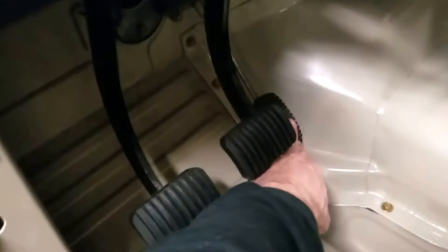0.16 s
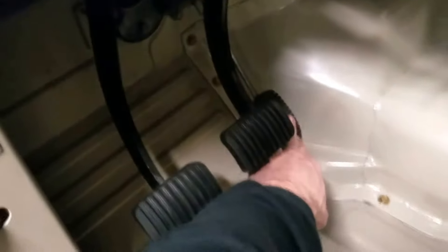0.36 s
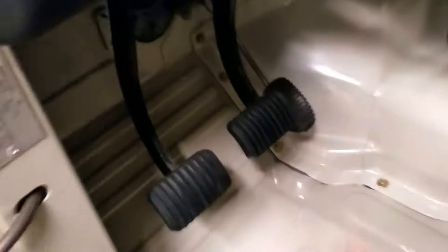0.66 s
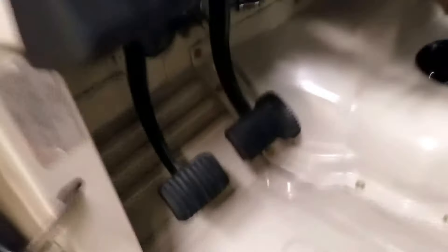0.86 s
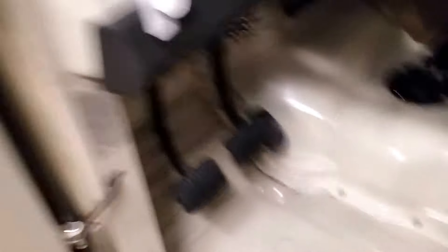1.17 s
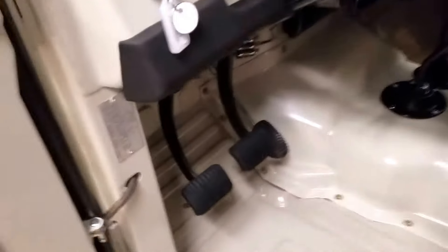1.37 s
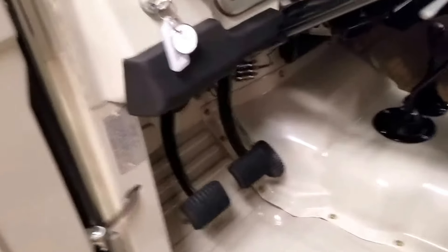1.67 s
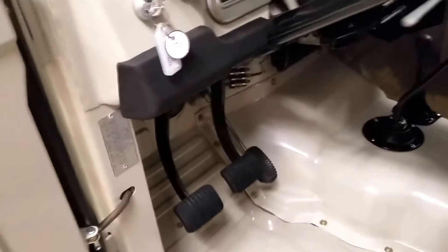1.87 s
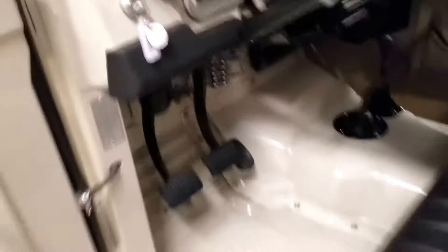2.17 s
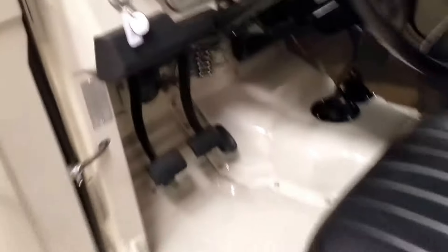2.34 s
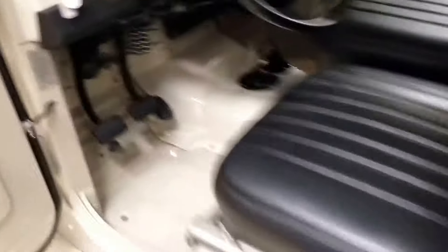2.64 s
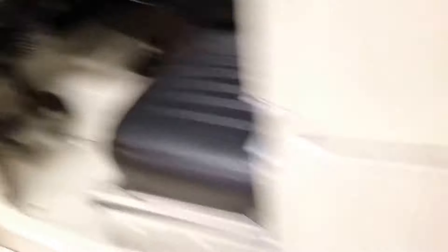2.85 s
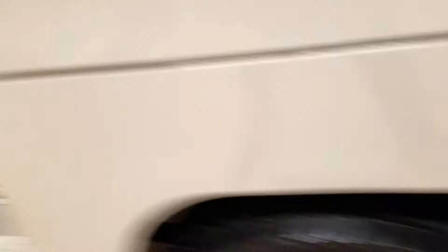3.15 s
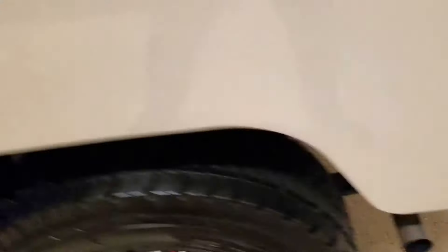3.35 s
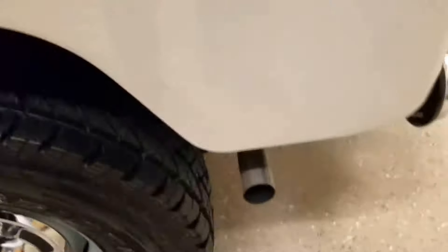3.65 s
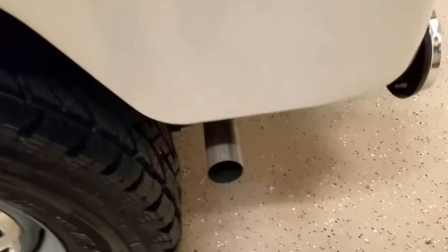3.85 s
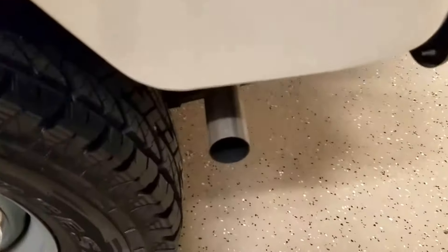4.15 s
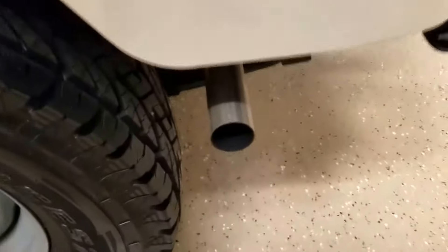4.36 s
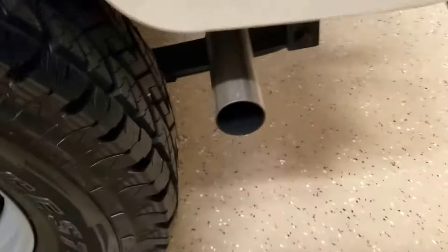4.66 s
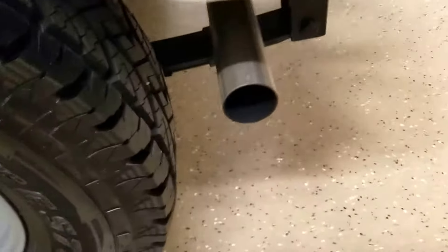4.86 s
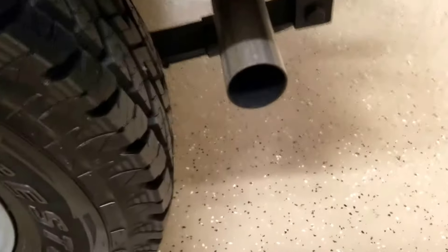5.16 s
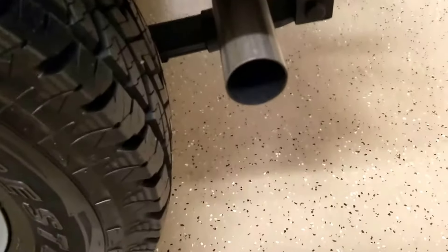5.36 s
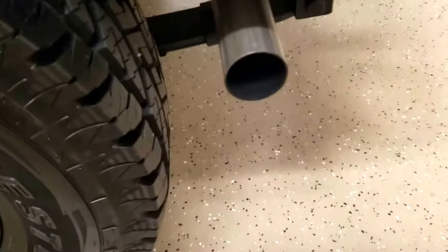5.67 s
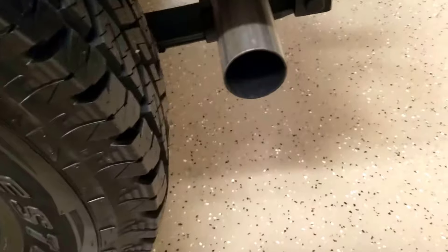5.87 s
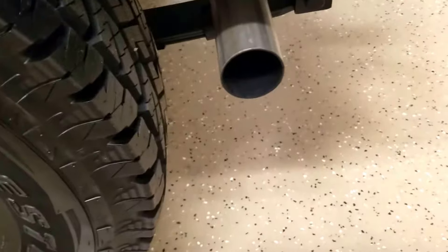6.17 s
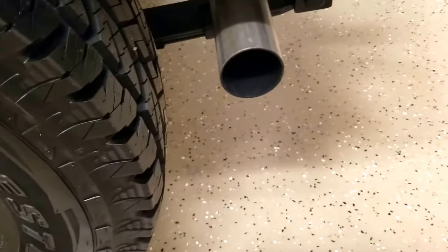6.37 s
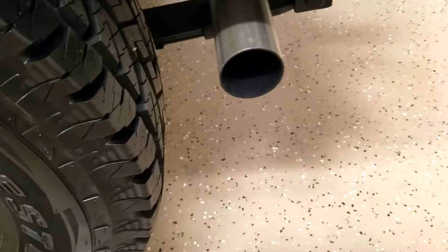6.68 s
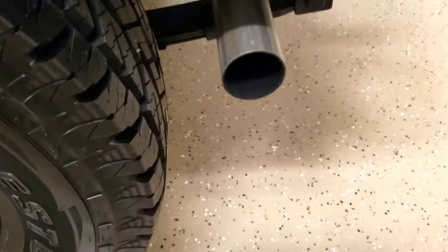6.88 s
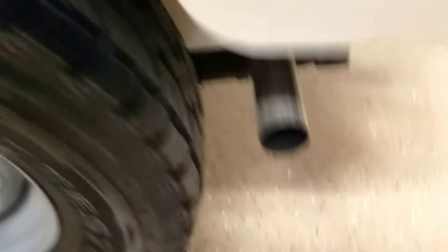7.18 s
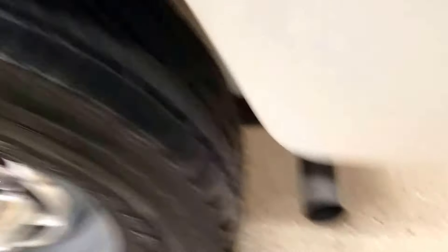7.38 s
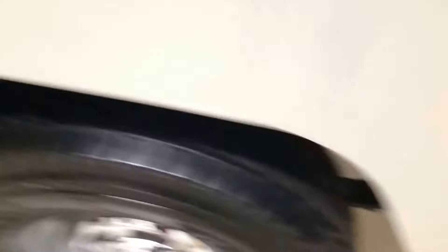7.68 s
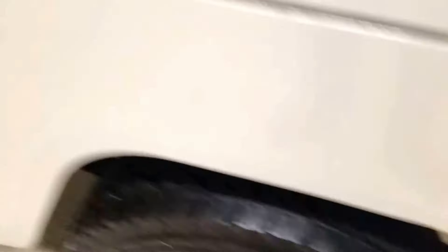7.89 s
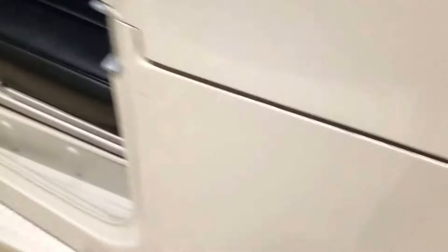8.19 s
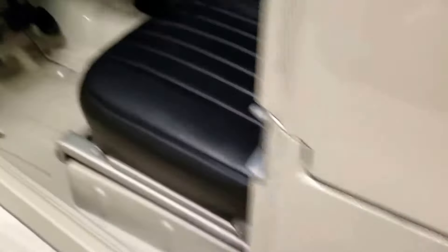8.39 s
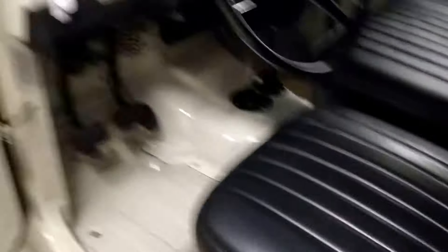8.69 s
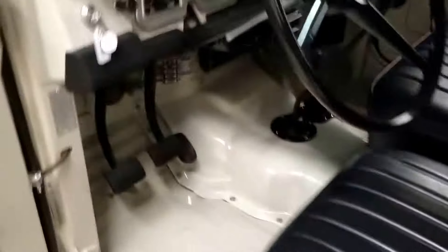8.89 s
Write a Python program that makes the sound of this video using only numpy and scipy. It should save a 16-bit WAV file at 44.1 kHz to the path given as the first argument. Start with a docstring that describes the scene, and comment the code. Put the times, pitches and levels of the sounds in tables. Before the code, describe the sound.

An old six-cylinder petrol engine gets one quick throttle dab, sinks to a loping idle, then thumps and whistles up close at the tailpipe.

```python
"""Four-by-four idling in a garage

An old six-cylinder petrol engine gets one dab of throttle, then sinks back to idle.
Two microphones start in the footwell, move past the droning body to the tailpipe, and head back.
Each firing sends a pressure thump through the exhaust and a puff of gas out of its whistling mouth.
Shaped noise makes valve clatter, intake hiss and roar; rough, wavering tones make the fan; the garage echoes."""
import sys
import numpy as np
from scipy import signal
from scipy.fft import rfft, irfft, next_fast_len
from scipy.io import wavfile
from scipy.ndimage import map_coordinates

SR = 44100
rng = np.random.default_rng(int(sys.argv[2]) if len(sys.argv) > 2 else 0)


def dump(signal):
    """Clip the signal to [-1, 1] and save it as 16-bit WAV at the path in sys.argv[1]."""
    limited = np.clip(np.atleast_2d(signal).T, -1, 1)
    pcm = np.round(limited * 32767).astype(np.int16)
    wavfile.write(sys.argv[1], SR, pcm)


N = 398223

# gas leaving the pipe, one row per cylinder in firing order:
# (puff [dB], low whistle [dB], high whistle [dB], delay [s])
PUFFS = [(-1, -3, -3, 0.0029), (-.5, 0, 1, 0.0032), (1, 0.5, 1.5, -0.0009), (-.5, -1.5, 1.5, 0.0029),
         (-1.5, 0, 0, 0.00011), (3, 3, 1.5, -0.000096)]
CYLINDERS, FIRINGS_PER_TURN = 6, 3
IDLE_HZ = 44  # firings per second
FOOTWELL_M = 2.59  # farther than this from the tailpipe, one is in the footwell


def amp(db):
    """Decibels to gain."""
    return 10 ** (np.asarray(db) / 20)


def unit(x):
    """Scale to rms 1."""
    return x / np.sqrt(np.mean(x ** 2) + 1e-20)


def along(points, hz):
    """Read a value at hz from (frequency, value) points on a log frequency axis."""
    f, v = np.transpose(points)
    return np.interp(np.log(hz + 1), np.log(f + 1), v)


def curve(points):
    """Join (time, value) points by straight lines, one value per sample."""
    s, value = np.transpose(points)
    return np.interp(np.arange(N) / SR, s, value)


def wobble(rate):
    """A smooth random curve with rate random knots a second."""
    knots = rng.standard_normal(int(N * rate / SR) + 4)
    return map_coordinates(knots, [np.arange(N) * rate / SR])


def filtered(x, response):
    """Multiply the spectrum of x by a response, a function of frequency."""
    m = next_fast_len(N + SR // 2)
    return irfft(rfft(x, m) * response(np.fft.rfftfreq(m, 1 / SR)), m)[..., :N]


def resonate(x, modes):
    """Ring x through resonances, each strongest at its own centre frequency; rms 1."""
    def response(f):
        total = 0
        for k, (centre, width, db) in enumerate(modes):
            band = 1j * f * width
            # neighbouring resonances have opposite polarity
            total = total + (-1) ** k * amp(db) * band / (centre * centre - f * f + band)
        return total
    return unit(filtered(x, response))


def rush(spectrum):
    """Stereo noise of rms 1; how alike the two sides are depends on frequency."""
    # left-right likeness of noise: (frequency [Hz], correlation [-1 to 1])
    likeness = [(100, 0.87), (300, 0.29), (650, 0.93), (1400, -0.54), (3000, 0.052), (6800, -0.25),
                (15000, -0.054)]

    def colour(hz):
        turn = np.arccos(np.clip(along(likeness, hz), -1, 1)) / 2
        return amp(along(spectrum, hz)) * np.array([np.cos(turn), np.sin(turn)])
    mid, side = filtered(rng.standard_normal((2, N)), colour)
    return unit(np.array([mid + side, mid - side]))


def pulses(times, db):
    """One impulse at each time."""
    at = np.round(times * SR).astype(int)
    inside = (at >= 0) & (at < N)
    return np.bincount(at[inside], amp(db)[inside], N)


def gusts(times, db, rise, decay, steady):
    """An envelope of rms 1 that swells and dies after each time (in seconds), over a steady share."""
    t = np.arange(SR // 12) / SR
    shape = (1 - np.exp(-t / rise)) * np.exp(-t / decay)
    bursts = signal.fftconvolve(pulses(times, db), shape)[:N]
    return unit(steady + unit(bursts))


def scatter(db, spread_db):
    """Levels that differ a little from firing to firing."""
    return db + spread_db * rng.standard_normal(len(db))


def firing_rate():
    """Engine speed in firings per second: a quick rise, then a fall to idle."""
    # engine speed: (time [s], firing rate [Hz])
    speed = [(0.0, 46.99), (0.21, 53.98), (0.52, 82.92), (0.59, 82.87), (1.18, 51.39), (1.62, 43.8),
             (3.21, 43.35), (3.94, 44.56), (4.43, 43.93), (6.11, 44.6), (6.45, 44.23), (9.03, 44.49)]
    return curve(speed)


def revs():
    """Octaves of engine speed above idle."""
    return np.log2(firing_rate() / IDLE_HZ)


def pedal():
    """Throttle opening, 0 to 1: pressed, held, let go."""
    press_s, opening_takes_s = 0.042, 0.19
    lift_s, closing_takes_s = 0.577, 0.14
    t = np.arange(N) / SR
    opened = np.clip((t - press_s) / opening_takes_s, 0, 1)
    return opened * np.clip(1 - (t - lift_s) / closing_takes_s, 0, 1)


def distance():
    """Metres from the tailpipe to the microphones as they are carried along."""
    # the walk towards the tailpipe and back: (time [s], distance from the tailpipe [m])
    walk = [(0, 2.82), (1.9, 2.595), (2.35, 2.51), (2.8, 1.91), (3.2, 1.61), (3.35, 1.11), (3.9, 1.02),
            (5.1, 0.42), (6.85, 0.34), (7.5, 1.1), (8.0, 1.6), (9.03, 2.46)]
    return curve(walk)


def beyond(edge_m):
    """0 while nearer to the tailpipe than an edge, 1 once past it, with a soft step between."""
    softness_m = 0.075
    return (1 + np.tanh((distance() - edge_m) / (2 * softness_m))) / 2


def heard(spot):
    """Gain of a source at the microphones: it falls with distance and changes in the footwell."""
    place_m, reach_m, db, fall_db, shade_db = spot
    away = np.hypot(1, (distance() - place_m) / reach_m)
    return amp(db - fall_db * np.log10(away) - shade_db * beyond(FOOTWELL_M))


def boom(modes, hz):
    """Gain of a tone at hz in a set of air resonances, highest at their centres."""
    return sum(amp(db) / (1 + (2 * (hz - centre) / width) ** 2) for centre, width, db in modes)


def throb(phase, lag):
    """Deep tones at 1, 2 and 3 times the firing rate, swelled by cab and intake air, over an uneven lope."""
    # tailpipe throb, one row per multiple of the firing rate: (loudest place [m from tailpipe],
    # reach [m], level [dB], fall per tenfold distance [dB], loss in the footwell, negative is a gain [dB])
    throb_spots = [(.3, .9, -14, 25, -2.5), (.3, 1.17, -14.5, 43, 0), (.7, .9, -13.5, 27.5, 10.5)]
    # air resonances of the cab, and of the intake with the throttle open:
    # (centre [Hz], width [Hz], level [dB])
    cab_modes = [(55.2, 4, -14), (76, 6.5, -12), (140, 26, -14.5), (254, 12, -15.5)]
    intake_modes = [(63, 17.4, -4), (107, 11, -14.5), (150.6, 27, -13.5)]
    # the lope, between the firing harmonics:
    # (cycles per turn of the crank [count], level relative to the first throb [dB])
    lope_orders = [(4, -14.5), (8, -21.5), (10, -11.5)]
    lope_lag = 0.794  # firings after the first cylinder
    cab_wakes_octaves = 0.073  # the cab booms fully from this far above idle
    silencer_hz = 110

    speed = firing_rate()
    cab_share = beyond(FOOTWELL_M) * np.clip(revs() / cab_wakes_octaves, 0, 1)
    opening = pedal()
    lope = 0
    for order, db in lope_orders:
        turns = (phase - lope_lag) / FIRINGS_PER_TURN
        lope = lope + amp(db + wobble(8)) * np.cos(2 * np.pi * order * turns)
    out = heard(throb_spots[0]) * lope
    for k, spot in enumerate(throb_spots, 1):
        tailpipe = heard(spot)
        cab = cab_share * boom(cab_modes, k * speed)
        intake = opening * boom(intake_modes, k * speed)
        level = np.linalg.norm([tailpipe, cab, intake], axis=0)  # the powers add
        # tones above the silencer's resonance leave it inverted
        polarity = np.sign(silencer_hz - k * IDLE_HZ)
        out = out + polarity * level * amp(0.31 * wobble(18)) * np.cos(2 * np.pi * k * (phase - lag))
    return out


def thumps(times, db, modes):
    """Pressure pulses, very nearly alike from cycle to cycle, ring a hollow."""
    # random spread: 0.07 ms in time, 0.6 dB in level
    late, uneven_db = rng.standard_normal((len(times), 2)).T * [[.00007], [.6]]
    return resonate(pulses(times + late, db + uneven_db), modes)


def exhaust(times, cylinder):
    """Unequal manifold runs make the pulses lope; they ring the pipe and the hollow under the body."""
    # exhaust manifold, one row per cylinder in firing order: (arrival delay [s], thump level [dB])
    manifold = [(.0005, 2.1), (-.00045, -.6), (.00034, 0), (.00033, 1.3), (-.00083, -.6), (.0004, -.5)]
    # resonances of the pipe and of the hollow: (centre [Hz], width [Hz], relative level [dB])
    pipe_modes = [(164.5, 18.3, -5), (204.8, 8.6, 5), (268, 11, -12.5), (310, 12.9, -13.5),
                  (399.7, 7.8, -5.5), (439.7, 5.3, -8), (631.5, 24, -20.5), (689, 12, -26),
                  (809, 19.2, -17.5)]
    hollow_modes = [(177, 22, -8.5), (201, 16.7, 0), (231.8, 18, 2), (428, 20, -20)]
    # where pipe and hollow are heard: (loudest place [m from tailpipe], reach [m], level [dB],
    # fall per tenfold distance [dB], loss in the footwell [dB])
    pipe_spot = (-0.23, 0.5, -13, 11, 14)
    hollow_spot = (1.92, 0.76, -19, 40, 11)

    delay, thump_db = np.array(manifold)[cylinder].T
    arrivals = times + delay + .0012
    pipe = heard(pipe_spot) * thumps(arrivals, thump_db, pipe_modes)
    drone = heard(hollow_spot) * thumps(arrivals, thump_db, hollow_modes)

    # the hollow lies to the right: the left side hears it 0.4 ms later and 3 dB weaker
    def lateness(f):
        return np.exp(1j * np.pi * f * .0004 * np.array([[-1], [1]]))
    return pipe + filtered(drone, lateness) * amp([[-1.5], [1.5]])


def whistle(times, db, hz, length, stray, sag, spread_db):
    """Each slug of gas sings briefly at the pipe mouth; on average the pitch sags as the slug slows."""
    t = np.arange(int(length * SR)) / SR
    detune, start, late, slowing = rng.standard_normal((len(times), 4)).T[..., None]
    pitch = hz * (1 + stray * detune - sag * (1 + slowing) * (t / length - 1 / 4))
    tone = np.sin(2 * np.pi * (np.cumsum(pitch, axis=1) / SR + start))
    swell = np.sin(np.pi * np.sqrt(t / length)) ** 5
    notes = amp(scatter(db, spread_db))[:, None] * swell * tone
    # each note starts about a millisecond early or late
    at = np.maximum(np.round((times[:, None] + late / 1000 + t) * SR), 0).astype(int)
    return unit(np.bincount(at.ravel(), notes.ravel(), N)[:N])


def pipe_mouth(times, cylinder):
    """Each slug of gas leaves with a rasp, two whistles and a sharper spit that varies by cylinder."""
    # noise colours of the rasp, of the spit, and of the sizzle by the rear wheel arch:
    # (frequency [Hz], relative level per hertz [dB])
    rasp_colour = [(200, 14), (450, 14), (800, 11), (920, -21), (1400, 2.5), (1950, 14), (2300, 7.5),
                   (2900, -28), (3500, 2), (4600, -0.5), (5300, -3.5), (6000, -21), (14000, -43)]
    spit_colour = [(2600, -23), (3400, 6), (4200, -3.5), (5200, 3.5), (6000, -15), (7400, -9),
                   (12000, -19.5)]
    sizzle_colour = [(1400, -25), (1950, 0), (2260, 6.5), (2600, -10), (3300, -9), (4000, -13.5),
                     (4800, -37), (6000, -45), (7600, -20), (12000, -46)]
    # where the mouth and the rear wheel arch are heard: (loudest place [m from tailpipe], reach [m],
    # level [dB], fall per tenfold distance [dB], loss in the footwell [dB])
    mouth_spot = (0.53, 0.54, -23.5, 24.5, 1)
    arch_spot = (1.6, 0.86, -30, 53, 19)
    # beyond this distance the rear wheel hides the mouth, most of all its low whistle
    wheel_m, wheel_shade_db, extra_low_whistle_shade_db = 1.39, 6, 1

    puff_db, low_db, high_db, delay = np.array(PUFFS)[cylinder].T
    low = whistle(times - .007 + delay, low_db, hz=1053, length=.036, stray=.011, sag=.022, spread_db=2.1)
    high = whistle(times - .003 + delay, high_db, hz=2108, length=.033, stray=.012, sag=.016, spread_db=2.3)
    hidden = beyond(wheel_m)
    # the whistles catch well for a few firings, then less well
    low_gain = amp(-2 - extra_low_whistle_shade_db * hidden + 1.6 * wobble(11))
    high_gain = amp(-4.6 + 1.6 * wobble(11))
    tones = low_gain * low + high_gain * high

    chuff = gusts(times - .003, scatter(puff_db, 2.3), rise=0.0033, decay=0.0081, steady=0.73)
    # the spit exaggerates the differences between cylinders
    spurt = gusts(times - .004, scatter(2.2 * puff_db, 2.8), rise=.005, decay=.009, steady=.35)
    rasp = amp(-2.5 + wobble(13)) * chuff * rush(rasp_colour)
    spit = amp(-13.5 + 2.1 * wobble(10)) * spurt * rush(spit_colour)
    mouth = heard(mouth_spot) * amp(-wheel_shade_db * hidden) * (tones + rasp + spit)
    sizzle = heard(arch_spot) * amp(1.5 * wobble(13)) * spurt * rush(sizzle_colour)
    return mouth + sizzle


def throttle(phase):
    """The open throttle hisses; the block roars and growls on the crank's orders until the speed has fallen."""
    # noise colours of the intake hiss and the roar: (frequency [Hz], relative level per hertz [dB])
    intake_colour = [(1500, -12), (3500, -3.5), (6000, -2.5), (9000, -4.5), (13000, -2), (16000, 0)]
    roar_colour = [(20, 0), (60, 16.5), (140, 5.5), (230, -9), (430, 0), (650, -0.5), (900, -6), (1600, -9),
                   (2700, -17), (4500, -40)]
    intake_db, load_roar_db, rev_roar_db = -34, -32, -20.5
    roar_growth = 0.61  # power of the octaves above idle

    opening = pedal()
    roar = amp(load_roar_db) * opening + amp(rev_roar_db) * np.maximum(revs(), 0) ** roar_growth
    growl = 0
    for k in range(7, 22):  # cycles per turn of the crank
        tone = np.sin(2 * np.pi * (k * phase / FIRINGS_PER_TURN + rng.random()))
        growl = growl + amp(4 * wobble(12)) / np.sqrt(k) * tone
    block = rush(roar_colour) + amp(-7.5) * unit(growl)
    return amp(intake_db) * opening * rush(intake_colour) + roar * amp(0.49 * wobble(31.5)) * block


def engine_bay(phase, times, cylinder):
    """Valve gear clatters and ticks in step with the firings; the fan hums and whines, rough and wavering."""
    # noise colours of the clatter and the ticking: (frequency [Hz], relative level per hertz [dB])
    clatter_colour = [(25, -15), (60, 1.5), (120, 5.5), (230, 7), (330, -0.5), (600, -4), (900, -4.5),
                      (1150, -2.5), (1400, -9), (1750, -5.5), (2100, -6.5), (2900, -13.5), (4200, -18),
                      (5800, -27.5), (14000, -35.5)]
    tick_colour = [(3500, -22), (6000, 0), (7200, 4), (9200, -16.5), (11000, -2), (14500, 1.5),
                   (16000, -1.5)]
    # where clatter, ticks, fan hum and fan whine are heard: (loudest place [m from tailpipe], reach [m],
    # level [dB], fall per tenfold distance, negative is a rise [dB],
    # loss in the footwell, negative is a gain [dB])
    clatter_spot = (2, 1, -25, 8.5, 1)
    tick_spot = (3.5, 4.5, -41.5, -0.5, 4.5)
    fan_spot = (2.5, 2.3, -37, 15, -0.5)
    whine_spot = (2, 0.9, -36, 31, 9.5)
    blade_db_per_octave = 13  # the fan's blade tone grows with engine speed

    puff_db = np.array(PUFFS)[cylinder, 0]
    knock = gusts(times + .003, scatter(puff_db, 3.8), rise=0.0017, decay=0.0077, steady=2.1)
    tick = gusts(times - .003, scatter(1.1 * puff_db, 2.6), rise=.0014, decay=.005, steady=1.6)
    clatter = heard(clatter_spot) * knock * rush(clatter_colour)
    ticking = heard(tick_spot) * amp(1.4 * wobble(8)) * tick * rush(tick_colour)

    # the belt slips a little; the tones make about 9 and 27 cycles per firing
    fan = phase + .014 * wobble(34)
    blade = amp(3.5 * wobble(35)) * np.sin(2 * np.pi * 9 * fan)
    hum = heard(fan_spot) * amp(blade_db_per_octave * revs()) * blade
    whine_phase = phase + .009 * wobble(36)
    whine = heard(whine_spot) * amp(3.5 * wobble(40)) * np.sin(2 * np.pi * 27 * whine_phase)
    return clatter + ticking + hum + whine


def garage(x):
    """Walls give a short diffuse tail for each side: dying noise, thin in the bass."""
    # echo length: (frequency [Hz], time to fall by 60 dB [s])
    echo_length = [(100, 0.33), (1000, 0.4), (10000, 0.063)]
    hz, t, z = signal.stft(rng.standard_normal((2, SR // 2)), SR, nperseg=256)
    fading = amp(-60 * t / along(echo_length, hz)[:, None])
    tail = signal.istft(z * fading, SR, nperseg=256)[1]
    wet = signal.fftconvolve(x, tail / np.linalg.norm(tail[0]), axes=1)[:, :N]
    return filtered(wet, lambda f: amp(along([(120, -55), (220, -25.5), (450, -8.0), (2000, -3)], f)))


def scene():
    """One crankshaft times every source; the pipe's pulses stay dry, the engine and mouth echo in the garage."""
    phase = np.cumsum(firing_rate()) / SR - 1.09  # counted in firings
    firing = np.arange(-1, int(phase[-1]) + 1)
    times = np.interp(firing, phase, np.arange(N) / SR)
    cylinder = firing % CYLINDERS
    mouth = pipe_mouth(times, cylinder)
    engine = engine_bay(phase, times, cylinder) + throttle(phase)
    echo = garage(engine + mouth / 2)
    return mouth + engine + echo + exhaust(times, cylinder) + throb(phase, lag=0.27)


def record(dry):
    """The two microphones differ in colour; peaks are rounded and the top is cut."""
    # colour difference of the microphones: (frequency [Hz], left minus right [dB])
    lean = [(100, 0.5), (200, 2.4), (380, -0.5), (700, 0), (1050, -3), (2200, -7), (3400, -2.5), (5200, -7),
            (7000, 1.5), (11000, 4.5), (15000, -0.5)]
    top_hz = 15950
    pair = filtered(dry, lambda hz: amp(np.array([[1], [-1]]) * along(lean, hz) / 2))
    rounded = pair / (1 + np.abs(pair) ** 8) ** (1 / 8)
    return filtered(rounded, lambda hz: hz < top_hz)


dry = scene()
out = record(dry)
dump(out)
```